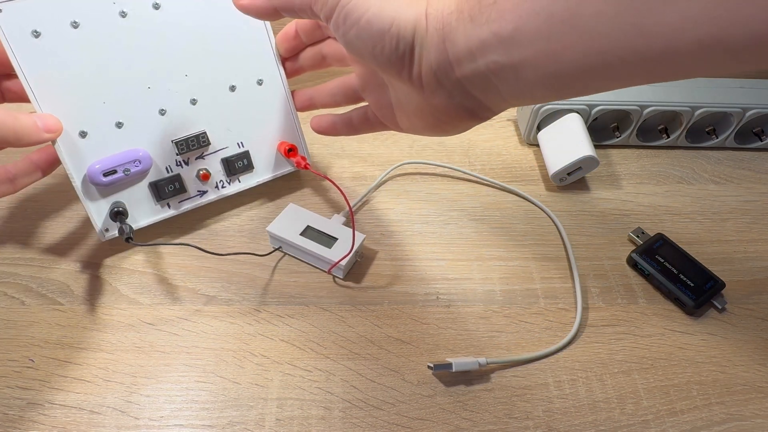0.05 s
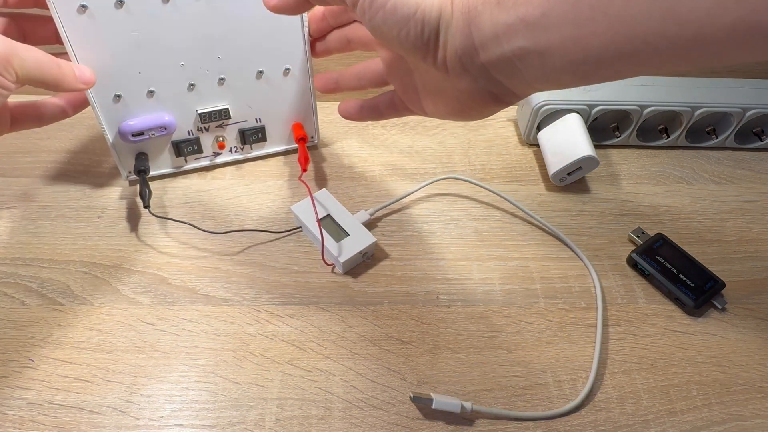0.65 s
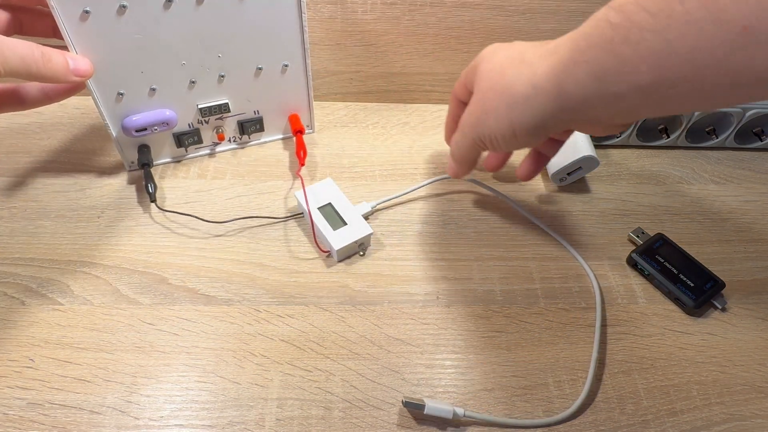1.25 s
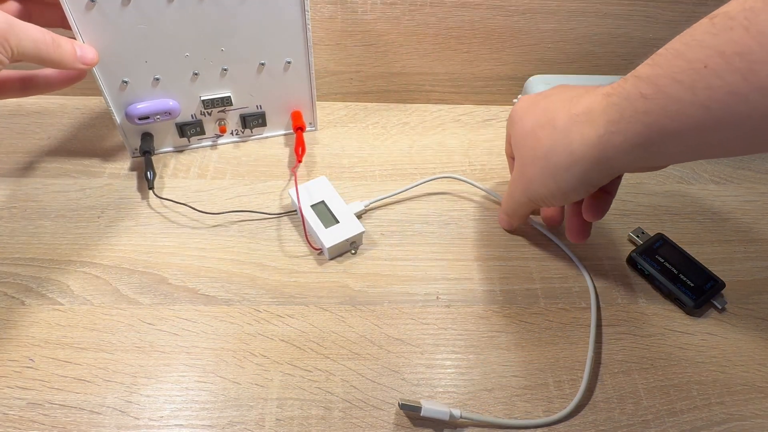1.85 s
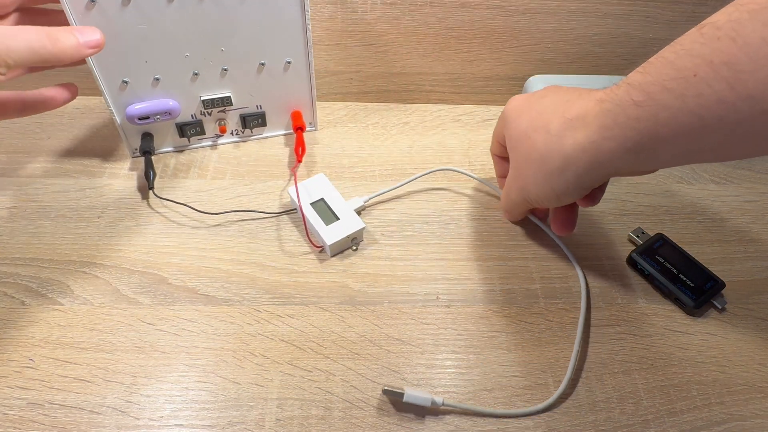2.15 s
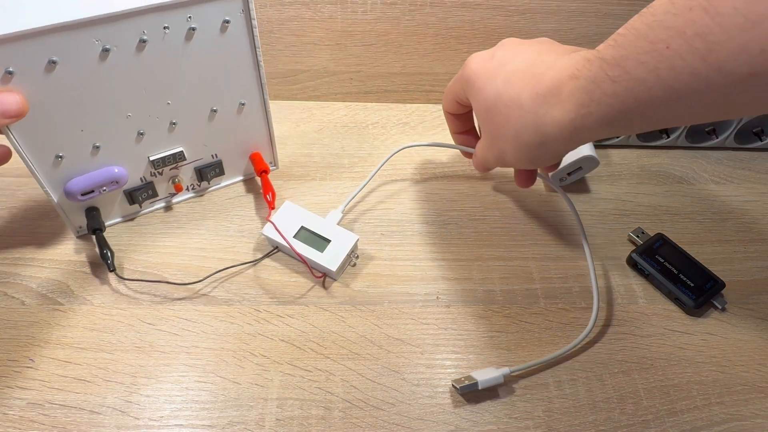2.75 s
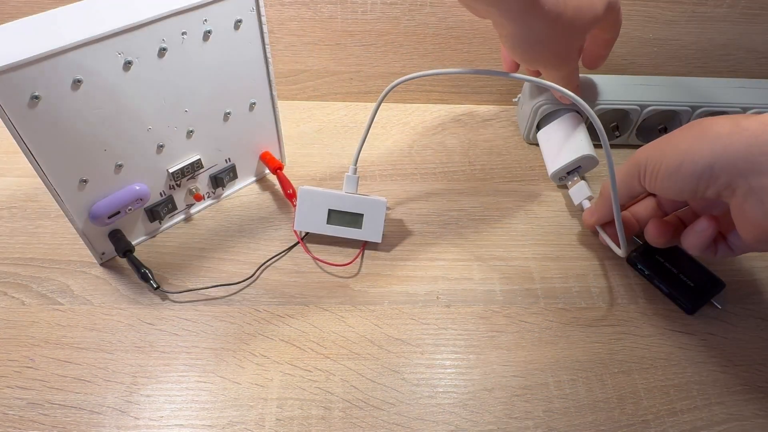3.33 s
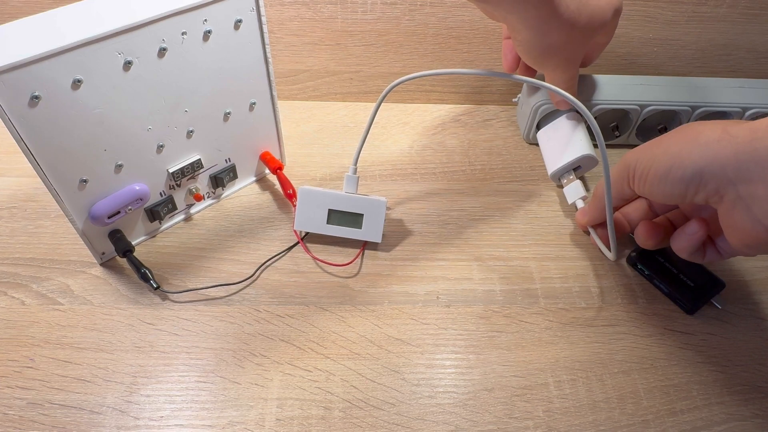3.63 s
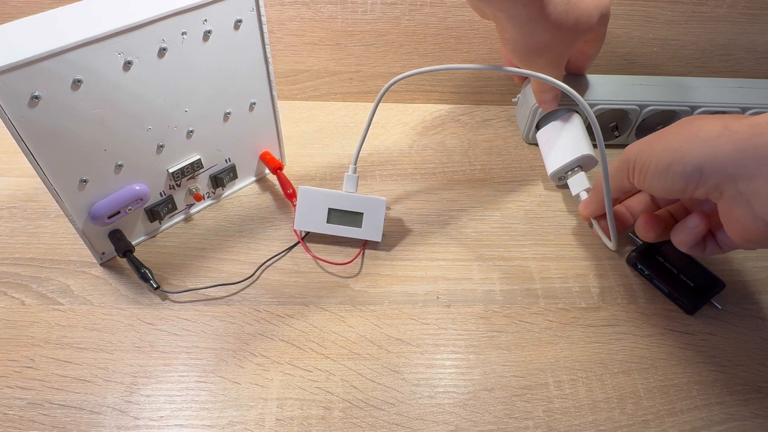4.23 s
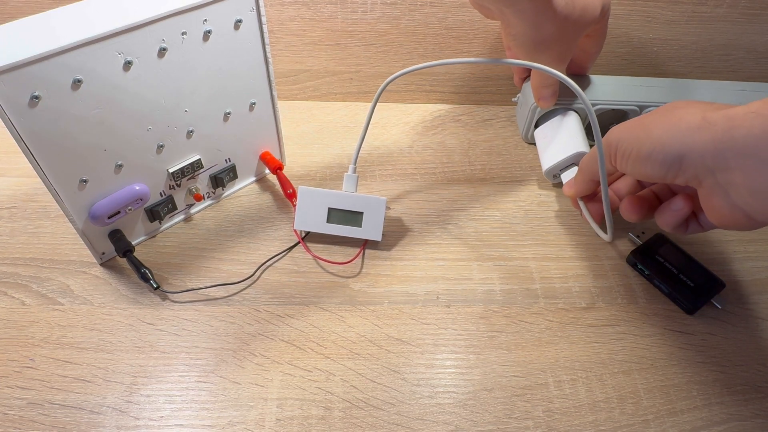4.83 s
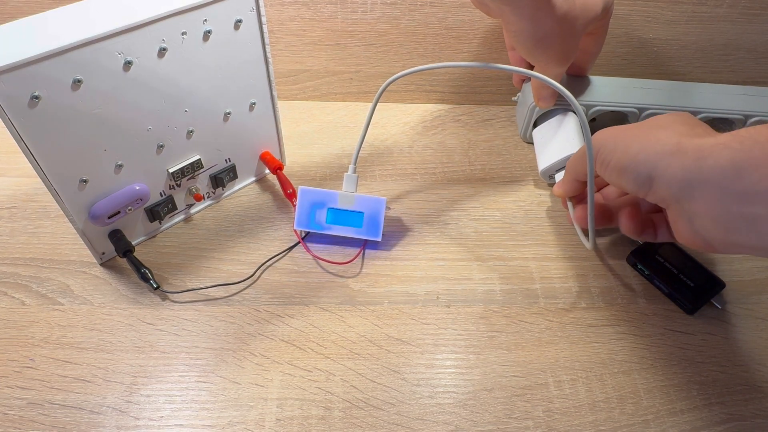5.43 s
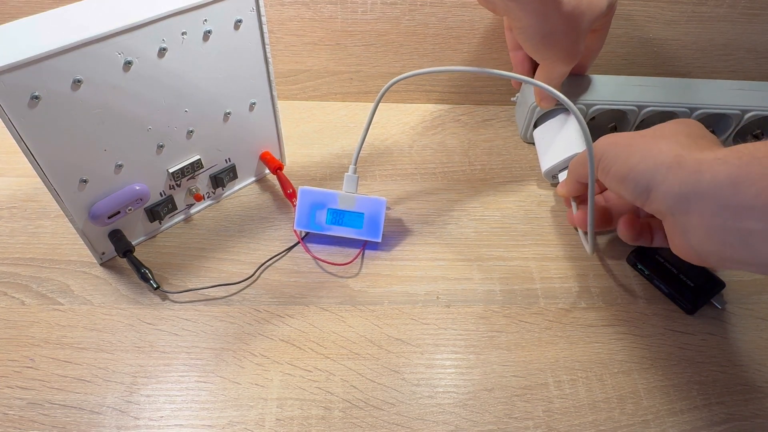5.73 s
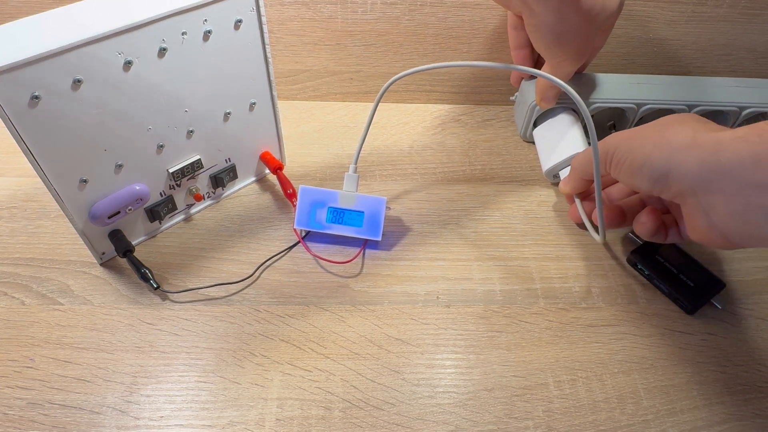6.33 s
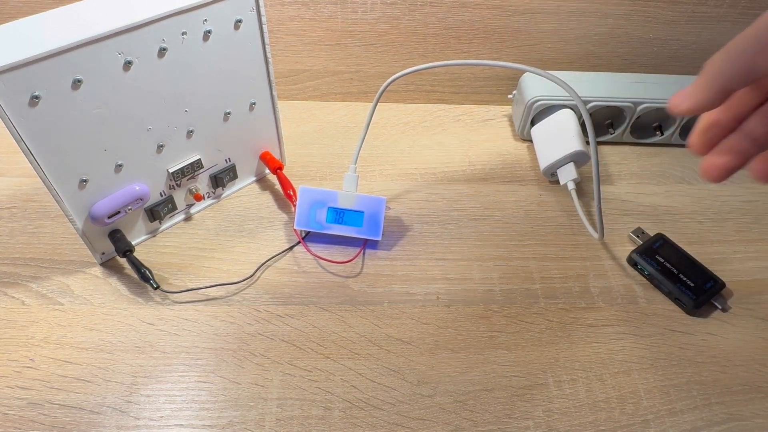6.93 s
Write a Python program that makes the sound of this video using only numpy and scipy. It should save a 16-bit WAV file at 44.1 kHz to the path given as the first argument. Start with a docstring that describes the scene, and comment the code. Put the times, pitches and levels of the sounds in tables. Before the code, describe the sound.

Close up in a small quiet room, a plastic box judders across a wooden tabletop and lands with one firm knock. Softer scrapes and bumps follow as a power strip shifts, and the box slides again, ending in a very brief dropout. The rest is much quieter: scattered plastic clicks, fingers rubbing and dull little bumps as a charger and its cable are plugged in.

```python
"""A light plastic box is turned on a wooden desk and set down with a knock at 0.9 s; its feet stick and
slip, so the desk top thrums under the scrape. A power strip is nudged, the box is pushed aside, and near
2.9 s all sound dips briefly. From 3.2 s fingers work a charger into the strip with small clicks, thumps
and rubbing. A small quiet room, one close microphone."""
import sys
import numpy as np
from scipy import signal
from scipy.fft import rfft, irfft, next_fast_len
from scipy.io import wavfile
from scipy.ndimage import map_coordinates

SR = 44100
rng = np.random.default_rng(int(sys.argv[2]) if len(sys.argv) > 2 else 0)


def wrap_up_sound(samples):
    """Save the sound to the file named by the first command line argument, as 16-bit audio."""
    columns = np.atleast_2d(samples).T
    # keep every value between -1 and 1, then stretch to whole-number steps
    tamed = np.clip(columns, -1, 1)
    steps = np.round(tamed * 32767).astype(np.int16)
    wavfile.write(sys.argv[1], SR, steps)


N = 311854
TIME = np.arange(N) / SR
AGE = np.arange(SR // 2) / SR  # time since a contact


def amp(db):
    """Level to amplitude: a factor of ten for every 20 dB."""
    return 10 ** (np.asarray(db) / 20)


def unit(x):
    """Normalisation to rms 1."""
    return x / np.sqrt(np.mean(x ** 2) + 1e-20)


def along(points, hz):
    """Interpolation of (f/Hz, value) points on a logarithmic frequency axis."""
    f, v = np.transpose(points)
    return np.interp(np.log(hz + 1), np.log(f + 1), v)


def filtered(x, response):
    """Linear filtering: the spectrum of x times a frequency response."""
    size = next_fast_len(len(x) + SR // 4)
    return irfft(rfft(x, size) * response(np.fft.rfftfreq(size, 1 / SR)), size)[:len(x)]


def coloured(x, spectrum):
    """Spectral shaping by (f/Hz, level/dB) points, at rms 1."""
    return unit(filtered(x, lambda f: amp(along(spectrum, f))))


def modal_sum(f, modes):
    """Modal superposition: the responses of damped resonators add."""
    return sum(amp(db) * 1j * f * width / (hz * hz - f * f + 1j * f * width) for hz, width, db in modes)


def band(x, low_hz, high_hz):
    """Causal band-pass filtering."""
    edges = np.clip([low_hz, high_hz], 10, SR / 2 - 10)
    return signal.sosfilt(signal.butter(2, edges, "band", fs=SR, output="sos"), x)


def wobble(rate):
    """Random modulation: straight lines between random values, rate of them a second."""
    return map_coordinates(rng.standard_normal(int(N * rate / SR) + 4), [TIME * rate], order=1)


def add(track, s, sound):
    """Superposition of a sound on the track at time s."""
    part = track[max(round(s * SR), 0):][:len(sound)]
    part += sound[:len(part)]


def slips(rate, spread_db, smooth):
    """Stick-slip force: random jerks of uneven size over a share of smooth friction."""
    jerks = (rng.random(N) < rate / SR) * rng.choice([-1, 1], N)
    sizes = amp(spread_db * rng.standard_normal(N))
    return unit(jerks * sizes) + smooth * rng.standard_normal(N)


def burst(low_hz, high_hz, t60):
    """Exponential decay of a noise band after a fast rise, with the energy of 5 ms at rms 1."""
    envelope = (1 - np.exp(-AGE / .0011)) * amp(-60 * AGE / t60)
    x = band(rng.choice([-1, 1], len(AGE)) * envelope, low_hz, high_hz)
    return x / np.sqrt(np.sum(x ** 2) / (SR / 200))


# spectrum of the room air: f/Hz, relative level/dB
ROOM_AIR = [(20, -41), (50, 7), (70, 1.5), (160, -5.5), (310, -8), (520, -13), (1050, -13.5), (1550, -16.5),
            (2300, -31), (4000, -34), (8000, -43), (13000, -38.5), (15800, -40.5)]
# faint thin whistles: t/s, duration/s, f/Hz, relative level/dB
WHISTLES = [(.73, .13, 3560, -72), (1.11, .2, 3545, -78), (1.46, .46, 2688, -69), (1.52, .3, 4484, -76),
            (1.56, .3, 1792, -73), (4.6, .16, 4390, -82)]
HUM_HZ = 203
def background():
    """Ambient noise floor: broadband air, a faint electrical hum and a few wavering whistles."""
    air = coloured(rng.standard_normal(N), ROOM_AIR)
    out = amp(-64.5 + 1.5 * wobble(4.2)) * air
    out += amp(-73) * np.sin(2 * np.pi * HUM_HZ * TIME + .4 * wobble(2.8))
    for s, length, hz, db in WHISTLES:
        swell = np.sin(np.pi * np.clip((TIME - s) / length, 0, 1))
        gain = amp(db - 2 + 2 * wobble(45))
        pitch = hz * (1 + .008 * wobble(150))
        out += gain * swell * np.sin(2 * np.pi * np.cumsum(pitch) / SR)
    return out


# reverberation time of the room: f/Hz, T60/s
ROOM_T60 = [(150, 0.89), (1500, .33), (6000, 0.22), (15000, 0.33)]
def room(x):
    """Reverberation: convolution with a diffuse tail, each frequency decaying at its own rate."""
    hz, t, spectra = signal.stft(rng.standard_normal(SR // 2), SR, nperseg=256)
    decay = amp(-60 * t / along(ROOM_T60, hz)[:, None])
    tail = signal.istft(spectra * decay, SR, nperseg=256)[1]
    tail = np.pad(tail, (SR // 200, 0))  # the walls answer after 5 ms
    return signal.fftconvolve(x, tail / np.linalg.norm(tail))[:N]


# dry ticks of the cables and plugs: t/s, level/dB
TICKS = [(.503, -56), (.528, -65), (1.647, -69.5), (1.777, -75), (3.417, -66), (3.477, -70.5), (5.255, -73),
         (6.195, -76)]
def ticks():
    """Light impacts: too weak to drive the desk, they radiate only a short high snap."""
    out = np.zeros(N)
    for s, db in TICKS:
        add(out, s, amp(db) * burst(5700, 15800, t60=.02))
    return out


# plastic catching as it rubs: t/s, duration/s, f/Hz, bandwidth/Hz, level/dB
SQUEAKS = [(.04, .28, 12800, 1000, -74), (0.216, 0.052, 1540, 700, -44.5),
           (0.241, 0.0079, 1560, 580, -35.5), (0.259, .006, 1580, 596, -34.5), (0.301, .12, 2400, 700, -50),
           (.3, 0.14, 4340, 680, -56.5), (0.882, 0.022, 1600, 400, -44), (1.012, 0.016, 715, 250, -41.5),
           (1.047, 0.056, 2020, 400, -48.5), (1.331, .017, 740, 308, -48), (1.524, 0.035, 840, 199, -52.5),
           (1.884, 0.021, 2530, 450, -51), (2.07, 0.18, 13300, 1500, -75), (2.791, 0.086, 2520, 251, -52.5),
           (3.858, 0.013, 2900, 595, -58.5), (4.01, 0.01, 1930, 1210, -47),
           (4.061, 0.06, 1440, 149.7, -58.5), (5.372, 0.18, 2920, 702, -76), (5.558, .05, 1300, 700, -65),
           (5.732, 0.042, 2820, 900, -56.5), (5.921, .017, 1550, 910, -62),
           (6.707, 0.046, 3030, 250, -72.5)]
def squeaks():
    """Friction-excited resonance: slips drive one narrow band of the plastic for a moment."""
    out = np.zeros(N)
    for s, length, hz, width, db in SQUEAKS:
        swell = np.sqrt(np.abs(np.sin(np.pi * np.clip(AGE / length, 0, 1))))
        force = slips(rate=1200, spread_db=2, smooth=.5)[:len(AGE)]
        add(out, s, amp(db) * swell * unit(band(force, hz - width / 2, hz + width / 2)))
    return out


# soft bumps of the box's feet and of fingers: t/s, relative level/dB, f/Hz
BUMPS = [(0.46, -32, 241), (1.354, -30, 296), (1.409, -32, 260), (2.276, -23, 288), (2.664, -23.5, 329),
         (4.18, -48.5, 223), (4.966, -29, 294), (5.608, -36.5, 312), (5.99, -38.5, 402), (6.054, -35, 304),
         (6.618, -32, 223), (6.717, -37.5, 294), (6.975, -46.5, 368)]
def bumps():
    """Damped free vibration: a soft contact rings a single low mode of the desk."""
    out = np.zeros(N)
    envelope = (1 - np.exp(-AGE / 0.00067)) * amp(-60 * AGE / 0.072)
    envelope /= envelope.max()
    for s, db, hz in BUMPS:
        add(out, s, amp(db - 3.5) * envelope * np.sin(2 * np.pi * hz * AGE))
    return out


# modes of the charger and socket: f/Hz, bandwidth/Hz, level/dB
PLUG_MODES = [(1005.4, 28, 0.5), (1510, 100, 1.5), (1835, 110, 3.5), (2680, 52, 7), (3120, 220, 5.5),
              (3970, 140, -8.5), (5520, 340, 3.5), (10040, 400, -2), (14230, 250, 1.5)]
# plastic clicks: t/s, relative level/dB, body f/Hz, hardness (treble over body)/dB
CLICKS = [(.462, -51, 830, -3), (.735, -54, 860, -14), (1.21, -56, 930, -25), (1.863, -56, 900, -22),
          (3.255, -50, 1070, -17), (3.477, -62, 1210, -25), (3.682, -45.5, 1200, -7),
          (3.861, -64, 1204, -11), (4.017, -44, 1560, -1), (4.052, -45.5, 1730, -2.5),
          (5.724, -43, 1070, -20.5), (5.939, -33.5, 1050, -21.5), (6.338, -49.5, 980, -17),
          (6.617, -62.5, 1400, -18), (6.974, -57, 783, -27), (7.03, -51, 935, -29)]
THUD_DB, SNAP_DB = -2.5, -8.5  # thud relative to body; snap relative to treble
def clicks():
    """Impact excitation: a hollow body, a snap and a thud in the desk, coloured by the plug's modes."""
    out = np.zeros(N)
    for s, db, hz, hardness_db in CLICKS:
        body = burst(hz / 1.56, hz * 1.23, t60=0.03)
        treble = burst(2400, 6800, t60=0.021) + amp(SNAP_DB) * burst(6000, 14500, t60=0.018)
        thud = amp(THUD_DB) * burst(120, 380, t60=0.32)
        add(out, s, amp(db) * (body + amp(hardness_db) * treble + thud))
    return filtered(out, lambda f: 1 + modal_sum(f, PLUG_MODES))


LIGHT_TOUCH_DB = -45  # reference level for the growth of grit and boom
GRIT_GROWTH, BOOM_GROWTH = 1.1, 1.11  # dB of grit per dB of scrape; dB of boom per dB of thrum
def slide(curve, grit_db):
    """Scrape, thrum and grit envelopes of a long slide; grit grows as a power law of the scrape."""
    s, scrape_db, thrum_db = np.transpose(curve)
    moving = np.interp(TIME, [s[0] - .01, s[0], s[-1], s[-1] + .03], [0, 1, 1, 0])
    gritty_db = scrape_db + grit_db + (GRIT_GROWTH - 1) * (scrape_db - LIGHT_TOUCH_DB)
    return [moving * amp(np.interp(TIME, s, db)) for db in (scrape_db, thrum_db, gritty_db)]


STROKE_RANGE_DB, EASE = 20, 1.1  # swing over a rise or fall; an exponent above 1 rounds off the top
def strokes(rows):
    """Scrape, thrum and grit envelopes: friction noise follows speed as a stroke rises, holds, falls."""
    gains = np.zeros((3, N))
    for s, rise, hold, fall, *levels_db in rows:
        slowness = np.clip(np.maximum((s + rise - TIME) / rise, (TIME - s - rise - hold) / fall), 0, 10)
        envelope = amp(-STROKE_RANGE_DB * slowness ** EASE)
        gains = np.maximum(gains, np.outer(amp(levels_db), envelope))
    return gains


# low bending modes and higher panel modes of the desk top: f/Hz, bandwidth/Hz, relative level/dB
BENDING_MODES = [(73, 16, -5), (117, 16, 0), (138, 28, -7), (167, 20, -1)]
PANEL_MODES = [(238, 35, -2), (280, 45, 0), (325, 45, -2), (365, 45, -10)]
# modes of the plastic shell: f/Hz, bandwidth/Hz, relative level/dB
SHELL_MODES = [(785, 65, 0), (1045, 40, -2), (1780, 100, -2), (2250, 50, -5), (2560, 110, -3),
               (3560, 45, -1)]
# spectrum of the fine grit in a scrape: f/Hz, relative level/dB
GRIT_SPECTRUM = [(4500, -20.5), (6500, 0), (8300, -8), (10500, -3), (13000, -2.5), (15800, -5.5)]
def drag(gains, spectrum, rate, spread_db, shell_db, judder_db, boom_db, shell_modes=SHELL_MODES):
    """Forced vibration: one stick-slip force drives desk and shell; heavy pressure adds boom."""
    scrape, thrum, grit = gains
    boom = amp(boom_db) * thrum * (thrum / amp(LIGHT_TOUCH_DB) + 1e-9) ** (BOOM_GROWTH - 1)
    force = slips(rate, spread_db, smooth=1.0) * amp(judder_db * wobble(90))
    desk = lambda modes: filtered(force, lambda f: modal_sum(f, modes))
    shell = lambda f: 1 + amp(shell_db) * modal_sum(f, shell_modes)
    rasp = unit(filtered(force, lambda f: amp(along(spectrum, f)) * shell(f)))
    fizz = coloured(force + .7 * rng.standard_normal(N), GRIT_SPECTRUM)
    bending = unit(band(desk(BENDING_MODES), 55, 230))
    panel = unit(band(desk(PANEL_MODES), 160, 400))
    return boom * bending + thrum * panel + scrape * rasp + grit * fizz


# spectrum of fingers on plastic: f/Hz, relative level/dB
GRIP_SPECTRUM = [(260, -6), (520, 7.5), (720, -4.5), (1000, -4.5), (1550, -7.5), (2200, -13.5), (3000, -17),
                 (5000, -22.5), (8000, -58), (11000, -61)]
# rubs on the charger: t/s, rise/s, hold/s, fall/s, scrape level/dB, thrum level/dB, grit level/dB
FINGER_RUBS = [(3.25, 0.035, 0.036, 0.072, -64, -59.5, -81.5), (4.06, 0.065, 0.055, .02, -75, -72.5, -77),
               (4.728, 0.023, 0.1, 0.17, -57.5, -48.5, -69.5), (4.88, 0.04, 0.064, 0.044, -54.5, -45, -69),
               (5.39, 0.12, 0.032, 0.056, -61, -54, -77), (5.55, 0.054, 0.027, .06, -59, -57, -78.5),
               (5.69, 0.037, 0.032, 0.052, -50.5, -56, -66), (5.78, 0.038, 0.015, 0.1, -59, -59.5, -81),
               (5.918, 0.0069, 0.023, 0.031, -61, -55, -69.5),
               (6.315, 0.032, 0.012, 0.051, -50, -50.5, -68.5),
               (6.39, 0.067, 0.1, 0.092, -61.5, -51, -82.5),
               (6.56, 0.05, 0.068, 0.016, -55.5, -50.5, -69.5),
               (6.69, 0.023, 0.042, 0.082, -67, -53.5, -100)]
def finger_rubs():
    """Skin friction: juddering fingers excite the modes of the charger and socket."""
    return drag(strokes(FINGER_RUBS), GRIP_SPECTRUM, rate=900, spread_db=-1,
                shell_db=-5.5, judder_db=3, boom_db=-14, shell_modes=PLUG_MODES)


# spectrum of the sliding strip: f/Hz, relative level/dB
STRIP_SPECTRUM = [(260, -68), (520, 1), (820, -1), (1100, -6.5), (1700, -12.5), (2700, -15), (5000, -25.5),
                  (8000, -47), (11000, -67)]
# nudges of the strip: t/s, rise/s, hold/s, fall/s, scrape level/dB, thrum level/dB, grit level/dB
STRIP_NUDGES = [(1.325, 0.017, 0.023, 0.076, -52.5, -47, -68.5),
                (1.325, 0.067, 0.081, 0.14, -48.5, -40.5, -65.5), (1.53, 0.054, 0.21, 0.11, -66, -87, -104),
                (1.858, 0.02, 0.012, 0.07, -49.5, -46.5, -69), (1.98, 0.039, 0.015, 0.071, -53, -49.5, -71),
                (2.03, 0.05, 0.064, 0.2, -49.5, -48.5, -80)]
def strip_nudges():
    """Sliding friction: the power strip's dense slips merge into a scrape with little shell resonance."""
    return drag(strokes(STRIP_NUDGES), STRIP_SPECTRUM, rate=2700, spread_db=2,
                shell_db=-8, judder_db=2.5, boom_db=-4.5)


# spectrum of the pushed box: f/Hz, relative level/dB
PUSH_SPECTRUM = [(260, -26), (480, 7.5), (800, 0), (1250, -2), (1750, -3.5), (2150, -8), (3500, -9.5),
                 (6000, -19), (8000, -33), (11000, -50)]
# course of the push: t/s, scrape level/dB, thrum level/dB
BOX_PUSH = [(2.22, -61.5, -57), (2.274, -46.5, -34.5), (2.334, -49, -37.5), (2.37, -43, -33),
            (2.408, -35.5, -38.5), (2.43, -35.5, -32), (2.598, -46, -34.5), (2.838, -46, -40),
            (2.85, -45.5, -44)]
def box_push():
    """Sustained stick-slip: nearly even jerks drive the desk's panel modes as the box is pushed aside."""
    return drag(slide(BOX_PUSH, grit_db=-16), PUSH_SPECTRUM, rate=1400, spread_db=0.5,
                shell_db=2.5, judder_db=1.5, boom_db=-12)


# spectrum of the turning box: f/Hz, relative level/dB
TURN_SPECTRUM = [(260, -37.5), (500, 2.5), (720, 2.5), (950, -4.5), (1600, -4), (2400, -12), (4400, -15.5),
                 (6000, -27), (8000, -53.5), (11000, -64.5)]
# course of the turn: t/s, scrape level/dB, thrum level/dB
BOX_TURN = [(0.0, -65.5, -58.5), (0.086, -54.5, -57), (0.148, -49.5, -42), (0.258, -43, -38.5),
            (0.292, -39, -42), (0.482, -45.5, -38), (0.542, -57, -51.5), (0.6, -56.5, -58.5)]
# short shoves of the box: t/s, rise/s, hold/s, fall/s, scrape level/dB, thrum level/dB, grit level/dB
BOX_SHOVES = [(.632, 0.013, .022, 0.057, -57.5, -61, -71), (.71, 0.024, 0.047, .05, -61.5, -56, -87),
              (.815, 0.031, .03, .03, -46, -42, -60.5), (.83, .055, 0.055, 0.028, -40.5, -31.5, -53.5),
              (.94, .025, 0.037, 0.1, -56.5, -42, -75.5), (.965, 0.088, 0.035, 0.039, -43.5, -40.5, -54)]
def box_turn():
    """Coarse stick-slip: the feet ring shell and desk as the box is turned, then shoved into place."""
    turn = drag(slide(BOX_TURN, grit_db=-15), TURN_SPECTRUM, rate=800, spread_db=2,
                shell_db=4.5, judder_db=1, boom_db=-3)
    shoves = drag(strokes(BOX_SHOVES), TURN_SPECTRUM, rate=800, spread_db=1.5,
                  shell_db=2.5, judder_db=1.5, boom_db=-4.5)
    return turn + shoves


# modes of the struck desk: f/Hz, relative level/dB, T60/s, build-up/s, delay/s
STRUCK_MODES = [(72, -25, .2, .006, .006), (120, -12, .17, .005, .009), (163, -11, .12, .004, .009),
                (240, -17, .09, .003, .004), (292, 7.5, .034, .003, .0036), (348, -16, .08, .003, .003),
                (570, -29, .07, .002, 0), (785, -9, .048, .001, 0)]
# spectrum of a blow's first touch: f/Hz, relative level/dB
CRACK_SPECTRUM = [(300, -13.5), (700, 9), (3000, -5.5), (8000, -17.5), (15000, -12.5)]
# blows on the desk: t/s, gain/dB, gain of the modes above 500 Hz/dB, relative crack level/dB
BLOWS = [(.911, -5, 0, -22), (.962, -22, -12, -35), (5.94, -31, -12, -25)]
def knocks():
    """Impulse response of a plate: the contact cracks first, and the heavy desk modes answer last."""
    out = np.zeros(N)
    for s, db, bright_db, crack_db in BLOWS:
        ring = 0
        for hz, level, t60, build, delay in STRUCK_MODES:
            t = np.maximum(AGE - delay, 0)
            decay = amp(level + bright_db * (hz > 500) - 60 * t / t60)
            ring -= decay * (1 - np.exp(-t / build)) * np.sin(2 * np.pi * hz * t)
        crack = coloured(rng.standard_normal(len(AGE)), CRACK_SPECTRUM)
        add(out, s, amp(db) * (ring + amp(crack_db - 60 * AGE / 0.0387) * crack))
    return out


# a brief dip of the whole sound: t/s, gain/dB
LEVEL_DIP = [(2.859, 0), (2.863, -30), (2.9, -42), (2.955, -38), (2.972, 0)]
def scene():
    """Superposition of direct sound, reverberation and background; the level dips once."""
    low = knocks() + bumps()
    sharp = clicks() + ticks()
    rubbing = box_turn() + strip_nudges() + box_push() + finger_rubs() + squeaks()
    reverberation = room(amp(-17.5) * (low + rubbing) + amp(-12) * sharp)
    mix = low + sharp + rubbing + reverberation + background()
    dip = amp(np.interp(TIME, *np.transpose(LEVEL_DIP)))
    return (mix * dip)[None]


BOTTOM_HZ, TOP_HZ = 44, 15850
def record(dry):
    """Band limiting: the microphone drops the deepest bass, and nothing is kept above TOP_HZ."""
    thinned = signal.sosfilt(signal.butter(4, BOTTOM_HZ, "high", fs=SR, output="sos"), dry[0])
    return filtered(thinned, lambda f: f < TOP_HZ)[None]


dry = scene()
out = record(dry)
wrap_up_sound(out)
```